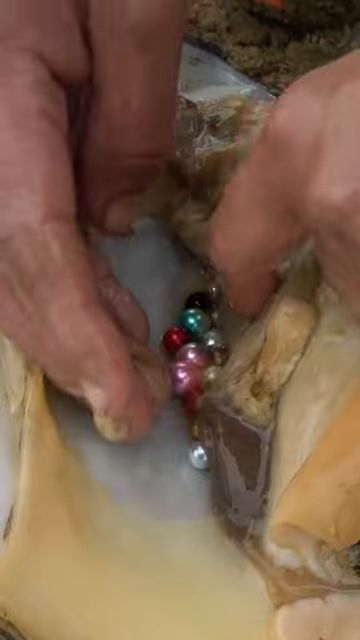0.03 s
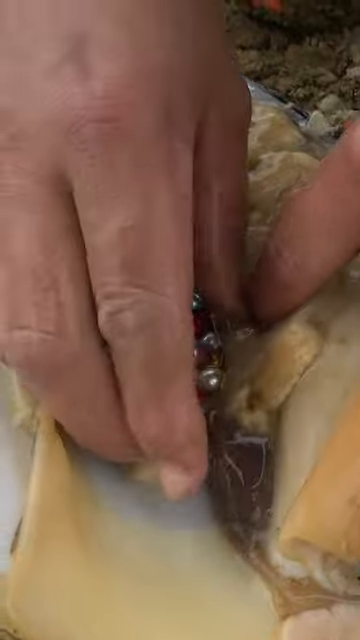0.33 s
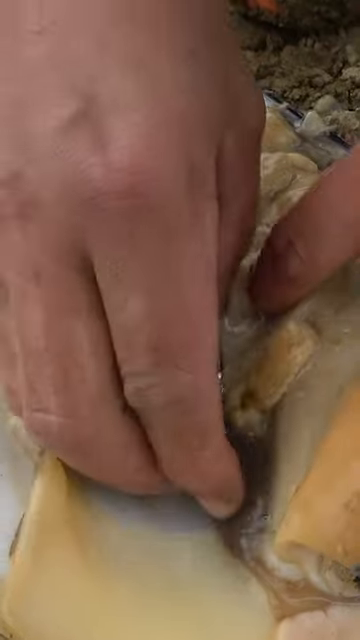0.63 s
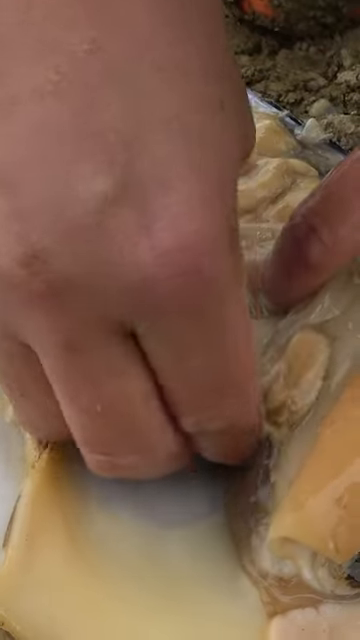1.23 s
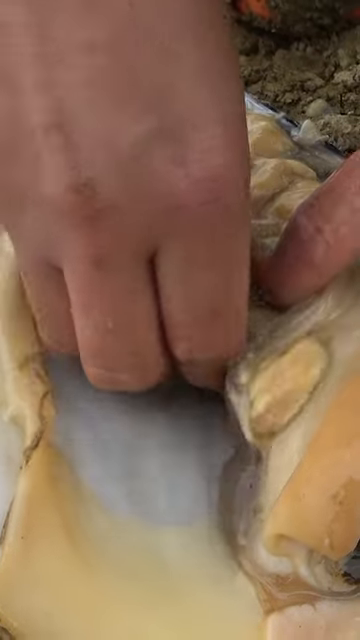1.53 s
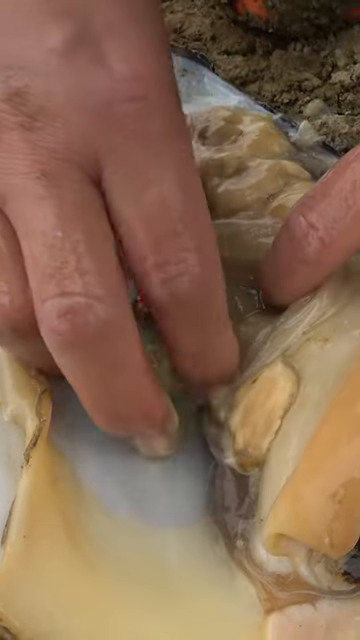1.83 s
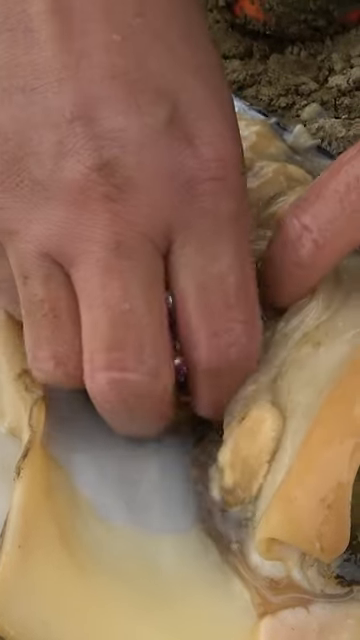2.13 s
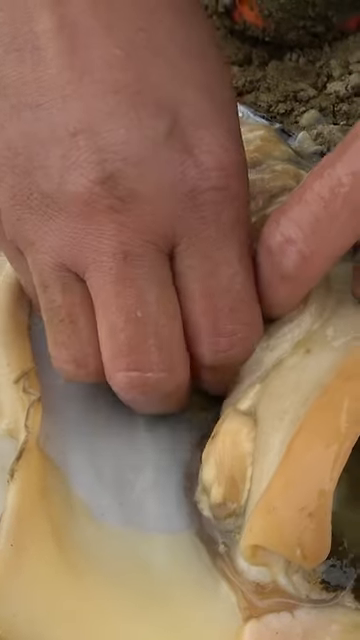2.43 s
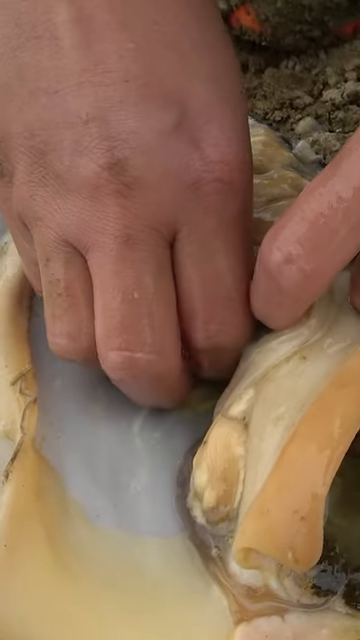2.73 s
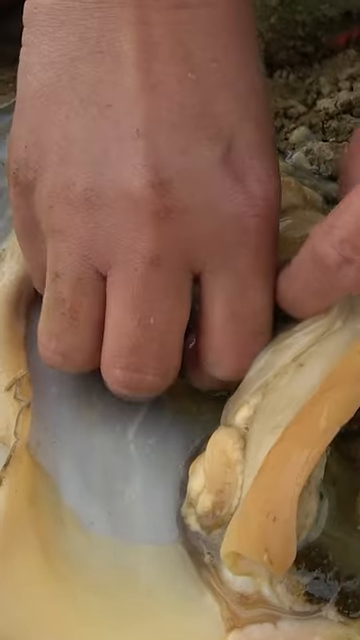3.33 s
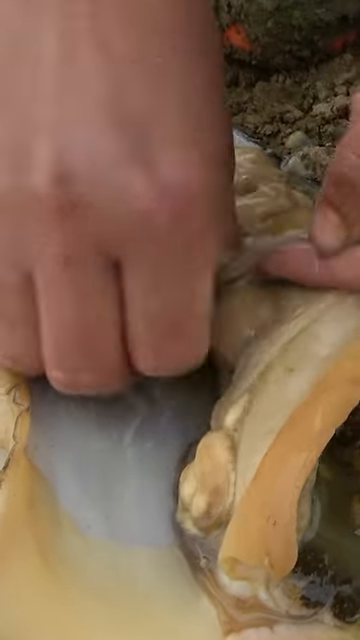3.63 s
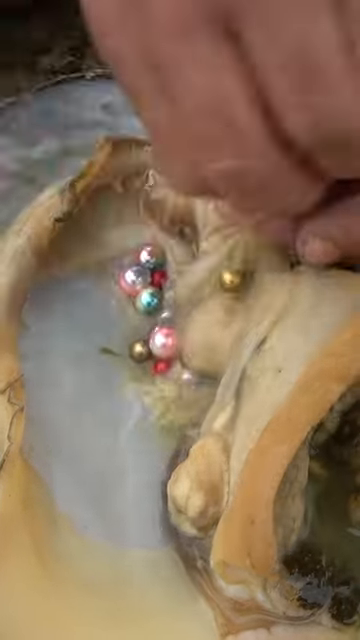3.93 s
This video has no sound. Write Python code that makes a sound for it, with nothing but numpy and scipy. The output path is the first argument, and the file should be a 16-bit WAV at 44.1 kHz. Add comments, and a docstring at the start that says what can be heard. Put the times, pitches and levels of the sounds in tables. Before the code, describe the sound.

Close to the microphone, pearls tick and rattle irregularly while a hand scoops them from an opened shell. Soft wet rubbing and tiny pops accompany them, ending in a quick run of clacks, with a low outdoor rumble far off.

```python
"""Gathering pearls from a wet shell

Outdoors, microphone close to an opened shell, the hand just left of centre, a low rumble far off.
Fingers rub the wet flesh, which hisses, crackles and ticks; small pearls click against each other and
the shell, and a few bounce free and ring. Pockets of water and air pop under the hand, and at last
the pearls clack together in the closing fist."""
import sys
import numpy as np
from scipy import signal
from scipy.fft import rfft, irfft, next_fast_len
from scipy.io import wavfile
from scipy.ndimage import uniform_filter1d, map_coordinates

SR = 44100
rng = np.random.default_rng(int(sys.argv[2]) if len(sys.argv) > 2 else 0)


def wrap_up_sound(samples):
    """Save the sound to the file named by the first command line argument, as 16-bit audio."""
    columns = np.atleast_2d(samples).T
    # keep every value between -1 and 1, then stretch to whole-number steps
    tamed = np.clip(columns, -1, 1)
    steps = np.round(tamed * 32767).astype(np.int16)
    wavfile.write(sys.argv[1], SR, steps)


N = 176400
ATTACK_S, TICK_T60_S = 0.00026, 0.0065
LEVEL_WINDOW = int(0.005 * SR)  # a contact's level is set over its first 5 ms


def amp(db):
    return 10 ** (np.asarray(db) / 20)


def unit(x):
    return x / np.sqrt(np.mean(x ** 2) + 1e-20)


def along(points, hz):
    """Read (f/Hz, value) points on a log frequency axis."""
    f, values = np.transpose(points)
    return np.interp(np.log(hz + 1), np.log(f + 1), values)


def filtered(x, response):
    """Pass x through a complex response of frequency."""
    size = next_fast_len(N + SR // 2)
    return irfft(rfft(x, size) * response(np.fft.rfftfreq(size, 1 / SR)), size)[..., :N]


def coloured(x, colour):
    """Shape x by (f/Hz, gain/dB) points, at rms 1."""
    return unit(filtered(x, lambda hz: amp(along(colour, hz))))


def minimum_phase(gain):
    """The causal response that has this gain."""
    cepstrum = irfft(np.log(np.maximum(gain, 1e-6)))
    half = len(cepstrum) // 2
    cepstrum[1:half] *= 2
    cepstrum[half + 1:] = 0
    return np.exp(rfft(cepstrum))


def add(track, start_s, sound):
    """Mix a sound into a track."""
    part = track[max(round(start_s * SR), 0):][:len(sound)]
    part += sound[:len(part)]


def lean(x, balance):
    """Place x in stereo by (f/Hz, left minus right/dB) points."""
    return filtered(x, lambda hz: amp(np.outer([.5, -.5], along(balance, hz))))


def stereo_noise(colour, likeness):
    """Noise of rms 1 whose left-right correlation varies with frequency."""
    def response(hz):
        angle = np.arccos(np.clip(along(likeness, hz), -1, 1)) / 2
        return amp(along(colour, hz)) * [np.cos(angle), np.sin(angle)]
    mid, side = filtered(rng.standard_normal((2, N)), response)
    return unit(np.array([mid + side, mid - side]))


def damped_tones(rows, rise_per_s=0, waver_rad=0):
    """One dying tone per (t/s, f/Hz, level/dB, t60/s) row, with optional pitch rise and phase waver."""
    out, t = np.zeros(N), np.arange(SR // 10) / SR
    onset = 1 - np.exp(-t / ATTACK_S)
    for start, hz, db, t60 in rows:
        waver = waver_rad * unit(uniform_filter1d(rng.standard_normal(len(t)), size=90))
        phase = 2 * np.pi * hz * t * (1 + rise_per_s * t / 2)
        add(out, start, amp(db - 60 * t / t60) * onset * np.sin(phase + waver))
    return out


def stick_slip(depth_db=1.5, per_s=45):
    """A smooth random gain: the skin sticks and slips."""
    knots = rng.standard_normal(N // 100)
    return amp(depth_db * map_coordinates(knots, [np.arange(N) * per_s / SR], mode="mirror"))


# Spectra of the far rumble and the open air: f/Hz, relative level/dB
RUMBLE_COLOUR = [(25, -15), (38, -4.5), (60, -6), (100, -2.5), (160, 1.5), (225, -1), (290, -14),
                 (450, -24), (700, -36.5), (1000, -58.5)]
AIR_COLOUR = [(210, -28), (350, 9), (921, 1.5), (1110, 8.5), (1460, -6.5), (2460, -32), (3380, -28),
              (3840, -18), (7130, -9.5), (15500, -18)]
# Likeness of the two microphone channels: f/Hz, correlation
RUMBLE_LIKENESS = [(50, 0.99), (400, 0.91)]
AIR_LIKENESS = [(400, 0.84), (3000, 0.84), (12000, 0.7)]
# Balance of the rumble, and of the air and hand near the microphone: f/Hz, left minus right/dB
RUMBLE_BALANCE = [(30, -9), (80, 8.5), (180, 6.5), (400, 0)]
NEAR_BALANCE = [(600, 4.6), (1400, 1.9), (2500, 0.039), (4000, 0.93), (6000, 4.1), (9000, 0.34),
                (13000, 1.9)]
# Swell of the rumble: t/s, level/dB
RUMBLE_SWELL = [(0.0, -45), (0.11, -40), (0.31, -43), (0.48, -38.5), (0.73, -45), (2.54, -43.5),
                (2.58, -48.5), (2.67, -40.5), (3.52, -40), (3.75, -45), (3.97, -41), (4.0, -36.5)]


def outdoors(rumble_trim_db=-0.5, air_db=-57.5):
    """A distant rumble swells gently, mostly on the left, under thin air noise."""
    swell = amp(rumble_trim_db + np.interp(np.arange(N) / SR, *np.transpose(RUMBLE_SWELL)))
    rumble = lean(stereo_noise(RUMBLE_COLOUR, RUMBLE_LIKENESS), RUMBLE_BALANCE)
    air = lean(stereo_noise(AIR_COLOUR, AIR_LIKENESS), NEAR_BALANCE)
    return swell * rumble + amp(air_db) * air


# Fingers pressing into the wet flesh: t/s, relative level/dB
RUB_LEVEL = [(0, -50), (.245, -54), (.3, -48.5), (.44, -49), (.49, -50.5), (.58, -52), (.7, -42.5),
             (.77, -49), (.85, -56), (.96, -47.5), (1.03, -49.5), (1.08, -42.5), (1.18, -54), (1.26, -46.5),
             (1.33, -47), (1.42, -46), (1.53, -38.5), (1.63, -46), (1.7, -39), (1.79, -46.5), (1.82, -55),
             (1.92, -60), (1.99, -41), (2.07, -40.5), (2.12, -48), (2.2, -38.5), (2.26, -40.5), (2.35, -40),
             (2.42, -42), (2.46, -39), (2.51, -48.5), (2.57, -42.5), (2.64, -48.5), (2.68, -53.5),
             (2.74, -48), (2.85, -53), (2.93, -35), (3.0, -48), (3.05, -34.5), (3.12, -42), (3.2, -47.5),
             (3.33, -45.5), (3.4, -47), (3.435, -58.5), (3.49, -50), (3.55, -47.5), (3.6, -43),
             (3.66, -51.5), (3.75, -40), (3.83, -46.5), (3.87, -48.5), (3.92, -45), (4, -53.5)]
# Spectrum of the rubbing at close range: f/Hz, gain/dB
RUB_COLOUR = [(300, 2), (800, -11.5), (1300, 2.5), (1900, -0.5), (2600, 5.5), (3300, -8.5), (3900, -3),
              (5000, -6.5), (7000, -11), (10000, -21), (15000, -28)]


def rubbing(hiss_db=-10, crackle_db=-8.5, max_crackles_per_s=450, densest_at_db=-40, t60_s=0.01):
    """Wet skin on flesh: a soft hiss with crackles, louder and denser as the fingers press harder."""
    level = amp(np.interp(np.arange(N) / SR, *np.transpose(RUB_LEVEL)))
    density = np.minimum(level / amp(densest_at_db), 1)
    onsets = rng.random(N) < density * max_crackles_per_s / SR
    grains = onsets * amp(6 * np.minimum(rng.exponential(size=N), 3.5))
    decay = np.exp(-np.log(1000) / (t60_s * SR))
    bursts = signal.lfilter([1], [1, -decay], grains) * rng.standard_normal(N)
    hiss = amp(hiss_db) * coloured(rng.standard_normal(N), RUB_COLOUR)
    crackle = amp(crackle_db) * coloured(bursts, RUB_COLOUR)
    return level * stick_slip() * (hiss + crackle)


def ticks(count=600, centre_hz=2664, spread_oct=0.4, spread_db=3.5):
    """Films of water break at random under the fingers, louder as they press harder."""
    starts = rng.uniform(0, N / SR, count)
    hz = np.clip(centre_hz * 2 ** (spread_oct * rng.standard_normal(count)), 1200, 9000)
    accent_db = 0.5 + spread_db * np.minimum(rng.exponential(size=count), 2.5)
    db = np.interp(starts, *np.transpose(RUB_LEVEL)) + accent_db
    return damped_tones(zip(starts, hz, db, np.full(count, TICK_T60_S)), rise_per_s=1.3)


# Pearl contacts, close up: t/s, relative level/dB, hollowness/dB, brightness/dB
CONTACTS = [(0.032, -26, -5, 3.5), (0.077, -41.5, -18, -4), (0.17, -51, 3, 12), (0.277, -32, 2, 5.5),
            (0.3432, -33.5, -13, 8.5), (0.377, -38, 3, 6), (0.4154, -44.5, -11, 4), (0.5313, -34, 2, 1.5),
            (0.619, -39, 11, 5), (0.6993, -31, -8, -3), (0.7077, -24, -18, 6.5), (0.714, -26.5, -12, -2),
            (0.8227, -41.5, -10, -10), (0.875, -45.5, 20, 2), (0.9411, -40.5, 2, -1), (0.9549, -38, 2, -15),
            (0.9763, -46, 1, 0), (0.997, -30, -6, 2), (1.0663, -35, -17, -7), (1.0807, -28, 8, 5),
            (1.089, -45, -12, 4), (1.117, -42.5, -12, 10), (1.137, -41, -10, 3), (1.144, -33, -22, 6),
            (1.207, -42.5, -19, 1), (1.252, -37.5, -5, -3), (1.275, -41.5, -14, -3), (1.378, -47, -5, -14),
            (1.394, -22.5, -5, -2), (1.432, -35.5, -2, -7), (1.4445, -34, 2, 0), (1.459, -17.5, -9, 7.5),
            (1.4721, -24, -1, 2), (1.4855, -44, -1, -11), (1.4924, -18, -5, 3), (1.4957, -20.5, -18, -7),
            (1.4987, -20.5, 1, 4), (1.505, -30, 2, -10), (1.5138, -23, 0, 1), (1.518, -22, -12, -9),
            (1.5208, -18.5, -5, 1), (1.5253, -21.5, -3, 2), (1.5305, -22, -10, -1), (1.5383, -25.5, -6, -2),
            (1.5409, -24, -11, 0), (1.56, -27.5, -4, -5), (1.5692, -29, -3, -8), (1.679, -33, -1, -9),
            (1.6921, -30.5, 0, 8), (1.698, -29, -8, 1), (1.7225, -33.5, -6, 9), (1.7367, -32, -13, -7),
            (1.7507, -26, 18, 21), (1.7703, -24, -11, -4), (1.7846, -26, 20, 14), (1.792, -29, 0, 13),
            (1.83, -33, 17, 7.5), (1.858, -43.5, 5, 4), (1.885, -46, -13, -4), (1.9343, -25.5, 13, 16),
            (1.937, -35, 11, 2), (1.972, -37, 7, -30), (1.981, -28, 13, 11), (1.99, -27.5, 9, -8),
            (2.0113, -24.5, 8, 1), (2.015, -26.5, -12, 31), (2.029, -33, 1, 10), (2.048, -41, -1, 13),
            (2.061, -40, 1, 6), (2.0822, -18.5, -3, 5.5), (2.092, -21.5, 9.5, 7.5), (2.1462, -38.5, -3, 19),
            (2.1674, -33.5, 8, 7), (2.1766, -21.5, -2, 8.5), (2.199, -39, 4, 2), (2.2362, -34.5, -12, -1),
            (2.288, -19, 6, 7.5), (2.292, -32, 3, 4), (2.3081, -21.5, -7, 3), (2.3271, -26, -7, 1),
            (2.3333, -18, 5.5, 1.5), (2.3633, -29.5, 18, -8), (2.386, -34, -8, -1), (2.3953, -33, -19, 2),
            (2.4511, -34, 5, -31), (2.462, -34, 13, 11), (2.4666, -17.5, -5, -10), (2.47, -22.5, -1, 17),
            (2.4869, -29.5, -3, -0.5), (2.523, -32.5, 20, -16), (2.5344, -18.5, -4, 1),
            (2.5442, -25.5, 9, 0.5), (2.5656, -29.5, 11, -4), (2.593, -40, 19, -13), (2.607, -25.5, -2, 3),
            (2.6162, -22.5, 13, -1.5), (2.6249, -27, 13, -48), (2.6903, -35, 13, 7),
            (2.7015, -34.5, 11, -29), (2.7106, -31, 11, -8), (2.7167, -36, 4, -16), (2.728, -27, 3, -3.5),
            (2.7321, -26, 11, -8), (2.7465, -24.5, 19, -2.5), (2.751, -28, -6, 2), (2.767, -32, 9, 1),
            (2.781, -28.5, 5, 5), (2.796, -25.5, 11, -1), (2.808, -24, 3, -3), (2.833, -37, 20, -11),
            (2.8383, -26, 21, 6), (2.8401, -22.5, 2, 4), (2.855, -25, 13, 0), (2.8574, -17, 7, -1),
            (2.8614, -21.5, 8, -35), (2.881, -19.5, 8, 2), (2.903, -35, 7, -26), (2.9124, -31, 5, -17),
            (2.919, -38, -8, 4), (2.94, -22, 6, -3.5), (3.022, -40.5, -10, -18), (3.0296, -33, -8, -9),
            (3.0405, -29, -8, -7), (3.0478, -22, -11, 8), (3.0543, -17, -11, 0.5), (3.0598, -20.5, -2, 0),
            (3.0696, -24, 1, -4), (3.088, -30, 10, -12), (3.0915, -30.5, 4, 0), (3.0959, -26.5, 0, -24),
            (3.1308, -35, 21, -21), (3.237, -35, 28, -26), (3.268, -47, 11, -31), (3.327, -36.5, -2, 12),
            (3.402, -47, 16, -2), (3.571, -39.5, 5, -18), (3.5883, -40, 15, 9), (3.5965, -35, 14, -3),
            (3.6107, -34.5, 13, 0), (3.6326, -26.5, 4, -6.5), (3.881, -42.5, -2, 11), (3.8982, -31, 5, 5.5),
            (3.9594, -35.5, -7, 13), (3.9886, -33.5, -1, 22)]
# Colour of a contact on the shell: f/Hz, gain/dB
SHELL_COLOUR = [(150, -33), (450, -23.5), (750, -33.5), (1100, -10), (1400, -8.5), (1750, -3.5), (2300, 6),
                (2800, 2), (3450, -2.5), (4000, -2.5), (4600, -6), (5300, -3.5), (8300, -6), (10500, -14),
                (13000, -22.5), (15500, -39)]


def clicks(trim_db=-2, firm_db=-22, pearl_hz=4887, spread_oct=0.96, wet_attack_s=0.00064, size=2048):
    """Each contact is a brief crack plus the pearl's ring, coloured by shell and cupped hand."""
    out, t, hz = np.zeros(N), np.arange(size) / SR, np.fft.rfftfreq(size, 1 / SR)
    body_t60, treble_t60, tail_t60, pearl_t60 = 0.015, 0.01, 0.051, 0.02  # s
    body_decay = amp(-60 * t / body_t60) + amp(-17.5 - 60 * t / tail_t60)
    treble_decay = amp(-60 * t / treble_t60) + amp(-32.5 - 60 * t / tail_t60)
    pearl_decay = amp(-11 - 60 * t / pearl_t60)
    shell_db = along(SHELL_COLOUR, hz)
    low = along([(1400, 0.73), (2100, 0.028)], hz)
    high = along([(2900, 0.045), (5000, 1.0)], hz)
    top = along([(7500, 0), (12000, 1)], hz)
    for start, db, hollow_db, bright_db in CONTACTS:
        top_db = 0.74 * (db - firm_db)  # firmer contacts reach higher into the treble
        wetness = np.clip(hollow_db / 10, 0, 1)  # wet, hollow contacts start more softly
        onset = 1 - np.exp(-t / (ATTACK_S + wet_attack_s * wetness))
        noise = onset * rng.standard_normal(size)
        modes_hz = np.minimum(pearl_hz * 2 ** (spread_oct * rng.standard_normal((3, 1))), TOP_HZ)
        ring = onset * pearl_decay * np.sin(2 * np.pi * modes_hz * t).sum(axis=0)
        crack = rfft(noise * body_decay) * (1 - high) + rfft(noise * treble_decay) * high + rfft(ring)
        # flatten the crack's broad outline so that the colour sets the tone
        outline = np.sqrt(np.abs(uniform_filter1d(np.abs(crack) ** 2, size=60)))
        colour = amp(shell_db + hollow_db * low + bright_db * high + top_db * top)
        click = irfft(crack * minimum_phase(colour / outline))
        add(out, start, amp(db + trim_db) * click / np.std(click[:LEVEL_WINDOW]))
    return out


def peeling(relative_db=-19, mean_lead_s=0.004, size=256):
    """Sticky skin lets go at each contact: two tiny cracks of the wet film, just ahead of the click."""
    out, t = np.zeros(N), np.arange(size) / SR
    shell = minimum_phase(amp(along(SHELL_COLOUR, np.fft.rfftfreq(size, 1 / SR))))
    for start, db, *_ in CONTACTS:
        for lead in rng.exponential(mean_lead_s, 2):
            burst = rng.standard_normal(size) * amp(-60 * t / TICK_T60_S)
            add(out, start - lead, amp(db + relative_db) * unit(irfft(rfft(burst) * shell)))
    return out


# Two thin chirps: t/s, starting f/Hz, level/dB
CHIRPS = [(.425, 4340, -55), (1.302, 4480, -57)]


def chirps(length_s=0.026, rise_hz_per_s=26000):
    """A faint whistle swells and fades as it glides up."""
    out, t = np.zeros(N), np.arange(int(length_s * SR)) / SR
    swell = np.sin(np.pi * t / length_s)
    for start, hz, db in CHIRPS:
        add(out, start, amp(db) * swell * np.sin(2 * np.pi * t * (hz + rise_hz_per_s * t / 2)))
    return out


# Fingertip strokes inside the shell: t/s, length/s, level/dB
STROKES = [(.59, 0.11, -55), (0.75, 0.2, -56), (3.08, 0.33, -55)]
# Spectrum of their hiss: f/Hz, gain/dB
STROKE_COLOUR = [(1200, -1), (2100, -4), (2700, -3), (3300, -4), (3900, 4), (4600, -13), (6800, -9.5),
                 (9000, -22), (14000, -22)]


def slides():
    """Fingertips slide over the smooth hollow of the shell, each stroke a faint swell of hiss."""
    level = np.zeros(N)
    for start, length, db in STROKES:
        add(level, start, amp(db) * np.hanning(int(length * SR)) ** .5)
    return level * stick_slip() * coloured(rng.standard_normal(N), STROKE_COLOUR)


# Loose pearls: t/s, f/Hz, level/dB, t60/s
BOUNCES = [(.7085, 2520, -39, 0.024), (.9974, 3930, -19.5, 0.0096), (1.09, 2670, -28, 0.024),
           (1.7376, 5020, -22, 0.017), (1.7514, 5530, -14.5, 0.0081), (1.793, 2605, -15, 0.018),
           (1.9375, 2590, -19, 0.021), (2.7968, 2710, -16.5, 0.015), (2.4675, 2230, -12, 0.023),
           (2.4675, 2580, -9.5, 0.019), (3.5105, 5100, -16, 0.014), (3.7903, 3200, -19, 0.011),
           (3.9597, 2440, -29, 0.026), (3.9597, 6130, -24.5, 0.011)]


def pings():
    """A pearl bounces free and rings briefly at a steady pitch."""
    return damped_tones(BOUNCES)


# Wet pockets under the hand: t/s, starting f/Hz, level/dB, t60/s
POCKETS = [(2.4523, 2050, -19, 0.016), (2.457, 1094, -27.5, 0.065), (2.595, 1450, -29, 0.028),
           (2.617, 1506, -19, 0.029), (2.628, 1100, -36, 0.035), (2.749, 1230, -20.5, 0.02),
           (2.767, 1365, -31, 0.039), (2.782, 1450, -20.5, 0.04), (2.809, 1420, -24.5, 0.034),
           (2.843, 1340, -14, 0.022), (2.860, 1350, -11.5, 0.02), (2.858, 620, -27.5, 0.027),
           (2.866, 2550, -30, 0.016), (2.882, 1620, -21, 0.029), (3.048, 1800, -13.5, 0.023),
           (3.055, 1590, -19, .016), (3.060, 1530, -15, 0.031), (3.07, 1540, -19.5, 0.032),
           (3.124, 670, -37.5, .03), (3.238, 1150, -34, 0.043), (3.241, 2120, -28, 0.033),
           (3.268, 1120, -33.5, 0.038), (3.268, 2300, -25.5, 0.018), (3.329, 1484, -27.5, 0.038)]


def pops():
    """A pocket of water and air collapses with an unsteady, slightly rising tone."""
    return damped_tones(POCKETS, rise_per_s=1.3, waver_rad=0.35)


# Pearls knocking in the closing fist: t/s, level/dB, brightness/dB
KNOCKS = [(3.5104, -19.5, -0.5), (3.6977, -24.5, 0.5), (3.7024, -30, -1), (3.7117, -37, -8),
          (3.7241, -17.5, 2), (3.734, -25, -7), (3.754, -19, -6), (3.7714, -25, -1), (3.7815, -16.5, -0.5),
          (3.7906, -32, 1), (3.8068, -23, -4), (3.819, -35, -2), (3.8279, -25, 3), (3.8378, -38, -5)]
# Modes of the fist's hollow and the pearls in it: f/Hz, relative level/dB, t60/s
FIST_MODES = [(1350, -9.5, 0.011), (2237, -0.5, 0.015), (2580, -6.5, 0.02), (3130, -3.5, 0.013),
              (3910, -6.5, 0.014), (4340, -9, 0.02), (4980, -6, .006), (5700, -7.5, 0.013),
              (6750, -8, 0.014), (7730, -6, .009), (8540, -6.5, .011), (9600, -9.5, 0.01),
              (11100, -7, 0.0043)]


def clacks(spread_db=2.5, detune_oct=0.03, snap_t60_s=0.029, size=2048):
    """Pearl on pearl: a hard snap rings the hollow of the fist, a little differently each time."""
    out, t = np.zeros(N), np.arange(size) / SR
    hz, mode_db, t60 = np.transpose(FIST_MODES)[..., None]
    high = along([(2700, 0.1), (5000, 1)], hz)
    shell = minimum_phase(amp(along(SHELL_COLOUR, np.fft.rfftfreq(size, 1 / SR))))
    onset = 1 - np.exp(-t / ATTACK_S)
    for start, db, bright_db in KNOCKS:
        strength, detune = rng.standard_normal((2, len(FIST_MODES), 1))
        polarity = rng.choice([-1, 1], hz.shape)
        decay = amp(mode_db + bright_db * high + spread_db * strength - 60 * t / t60)
        ring = (polarity * decay * np.sin(2 * np.pi * hz * 2 ** (detune_oct * detune) * t)).sum(axis=0)
        snap = 2 * rng.standard_normal(size) * amp(-12.5 + bright_db - 60 * t / snap_t60_s)
        clack = onset * ring + irfft(rfft(snap) * shell)
        add(out, start, amp(db) * clack / np.std(clack[:LEVEL_WINDOW]))
    return out


def reflections(x, level_db=-19.5, t60_s=0.021):
    """Faint short reflections reach the microphone from the ground and the body."""
    t = np.arange(SR // 5) / SR
    tail = rng.standard_normal((2, len(t))) * amp(-60 * t / t60_s)
    return amp(level_db) * signal.fftconvolve(x[None], tail / np.linalg.norm(tail[0]), axes=1)[:, :N]


# Lead of the left microphone port over the right: f/Hz, phase/rad
PORT_LEAD = [(0, -0.017), (5800, 0.031), (10800, -0.47)]


def scene():
    """The hand works close to the microphone, just left of centre, with the outdoors behind it."""
    hand = rubbing() + ticks() + clicks() + peeling() + chirps() + slides() + pings() + pops() + clacks()
    at_ports = filtered(hand, lambda hz: np.exp(1j * np.outer([.5, -.5], along(PORT_LEAD, hz))))
    return lean(at_ports, NEAR_BALANCE) + reflections(hand) + outdoors()


LOW_CUT_HZ, TOP_HZ = 35, 16300


def record(dry):
    """The camera's microphone cuts the deepest bass and keeps nothing above its band limit."""
    return filtered(dry, lambda hz: (hz < TOP_HZ) * np.minimum(hz / LOW_CUT_HZ, 1) ** 10)


dry = scene()
out = record(dry)
wrap_up_sound(out)
```